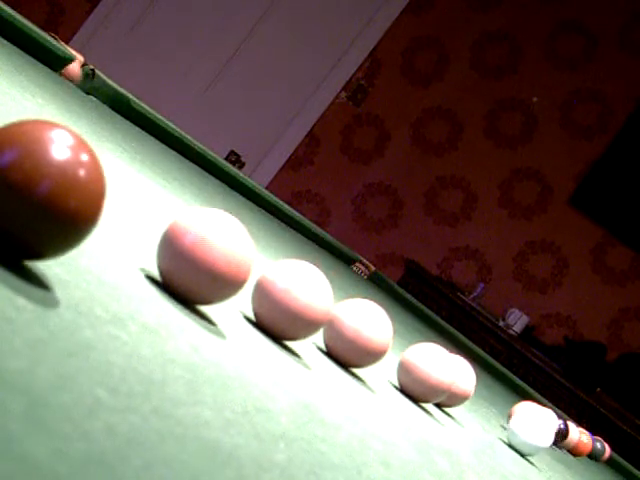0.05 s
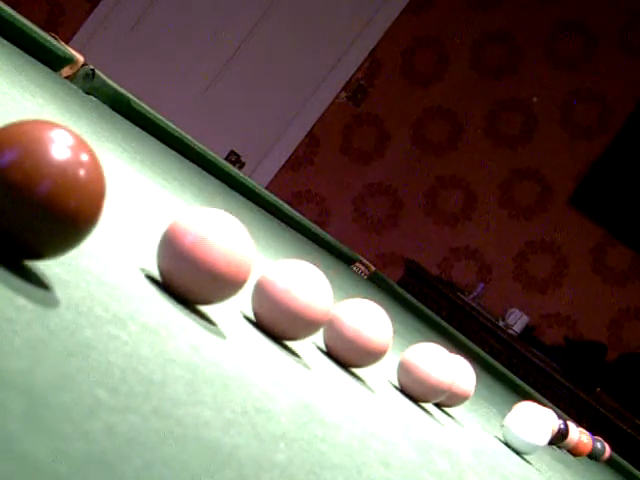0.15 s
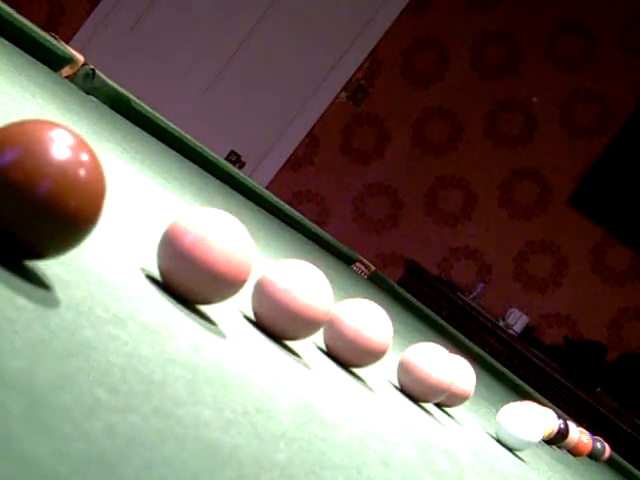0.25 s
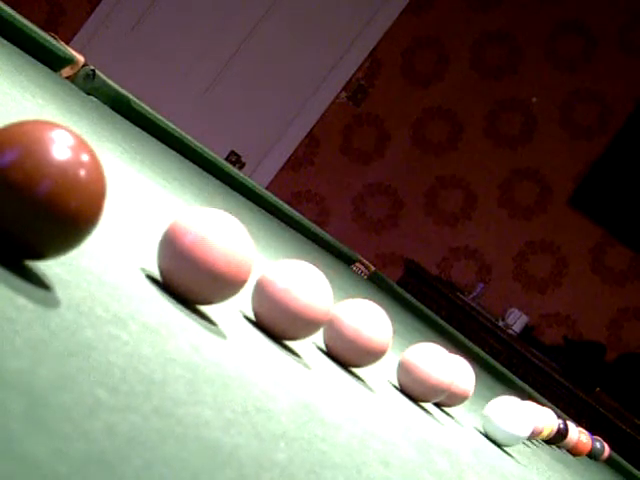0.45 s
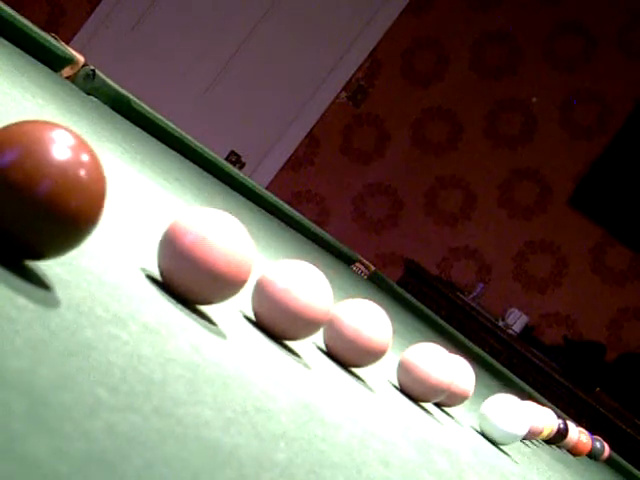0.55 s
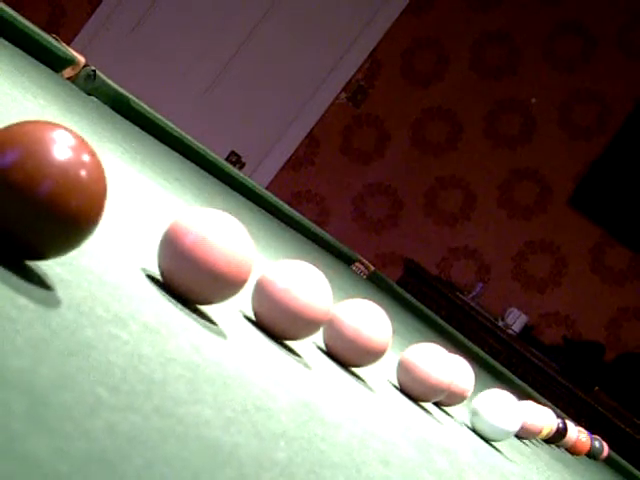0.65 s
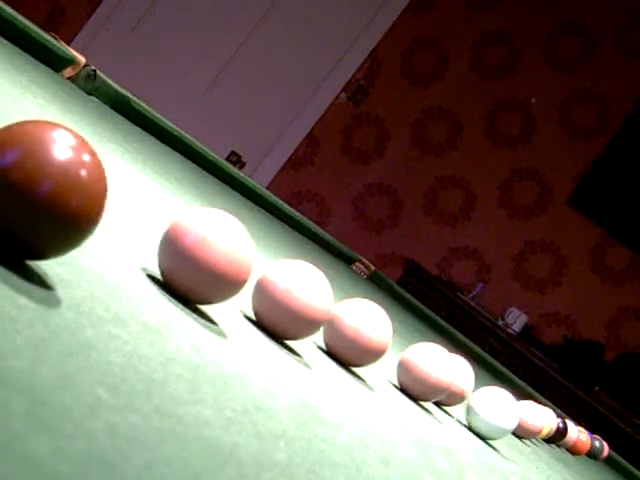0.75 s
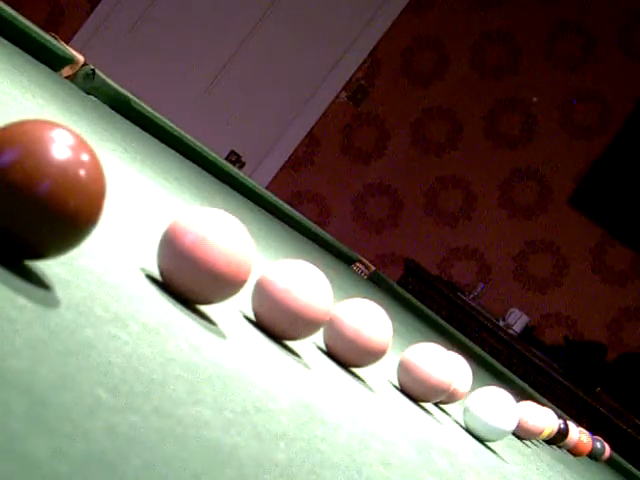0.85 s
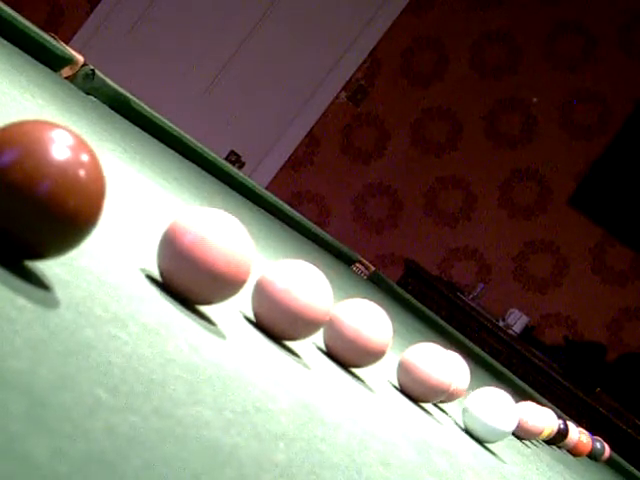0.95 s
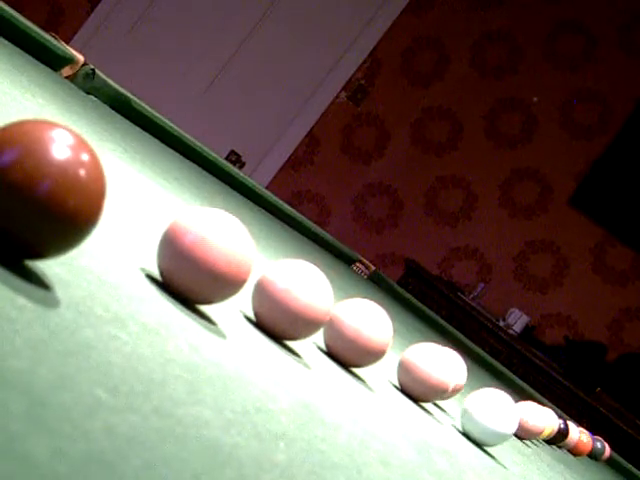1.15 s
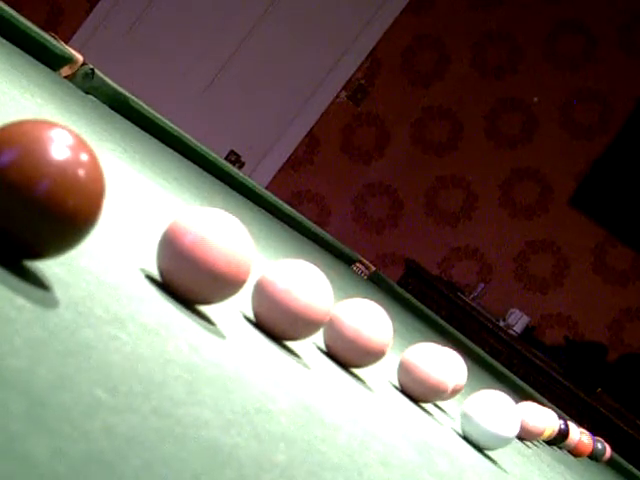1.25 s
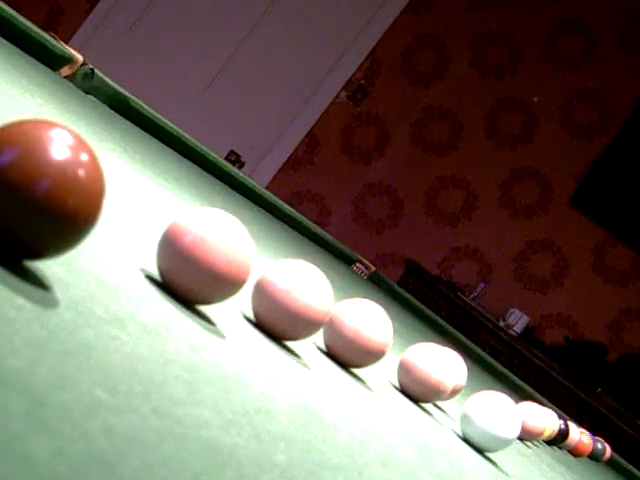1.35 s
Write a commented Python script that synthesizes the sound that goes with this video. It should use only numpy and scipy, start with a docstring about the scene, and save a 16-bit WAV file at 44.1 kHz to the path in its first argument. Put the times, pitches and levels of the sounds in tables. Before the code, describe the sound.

Heard from beside the table, a snooker ball knocks into a pocket just after a distant ball click fades. The thud echoes around a quiet hall, followed by a soft hiss and another faint, far click.

```python
"""A snooker ball thuds into a pocket close by, in a hard-walled hall that rings for about a second.
A quick run of contacts cracks and rings the pocket and rail, and the walls throw the thud back.
Balls click farther off, heard mostly as reverb; one click is already dying away at the start.
A soft hiss, a faint tap and a few low bumps pass over a quiet room tone."""
import sys
import numpy as np
from scipy import signal
from scipy.fft import rfft, irfft
from scipy.io import wavfile
from scipy.ndimage import uniform_filter1d

SR = 44100
rng = np.random.default_rng(int(sys.argv[2]) if len(sys.argv) > 2 else 0)


def inscribe(sig):
    """Save sig as 16-bit PCM at rate SR to the path in sys.argv[1].

    A 1-D sig is mono; a 2-D sig holds one channel per row.
    Samples are clipped to [-1, 1] before scaling.
    """
    pcm = np.round(np.clip(np.atleast_2d(sig).T, -1, 1) * 32767)
    wavfile.write(sys.argv[1], SR, pcm.astype(np.int16))


N = 61739
T = np.arange(N) / SR
FREQS = np.fft.rfftfreq(N, 1 / SR)


def amp(db):
    """Decibels to gain."""
    return 10 ** (np.asarray(db) / 20)


def by_hz(points, hz):
    """Read a curve of (f/Hz, value) points on a log-frequency axis."""
    curve = np.array(points, float)
    return np.interp(np.log(np.maximum(hz, 1)), np.log(curve[:, 0]), curve[:, 1])


def noise(colour):
    """Noise through an EQ curve, at rms 1."""
    x = irfft(rfft(rng.standard_normal(N)) * amp(by_hz(colour, FREQS)), N)
    return x / x.std()


def wavering_tone(hz, width_hz):
    """A narrow band of noise, at rms 1."""
    peak = 1 / (1 + ((FREQS - hz) / (width_hz / 2)) ** 2)
    x = irfft(rfft(rng.standard_normal(N)) * peak, N)
    return x / x.std()


def decay(start, t60):
    """Silence until start, then an exponential tail."""
    return (T >= start) * np.exp(-np.log(1000) * np.maximum(T - start, 0) / t60)


def attack(start, seconds):
    """A smooth rise from 0 to 1."""
    return 1 - np.exp(-np.maximum(T - start, 0) / seconds)


def ring(start, hz, t60):
    """One struck mode."""
    return decay(start, t60) * np.sin(2 * np.pi * hz * (T - start))


def delayed(x, seconds):
    """The same sound, shifted in time."""
    return np.interp(T - seconds, T, x, left=0)


def snap(start, colour, t60):
    """A noise transient, normalised to its peak."""
    burst = noise(colour) * decay(0, t60)
    return delayed(burst / np.abs(burst).max(), start)


def reflection_flicker(depth_db=1.27, grain_s=0.0024):
    """A grainy gain: single wall reflections arrive unevenly."""
    jitter = uniform_filter1d(rng.standard_normal(N), int(grain_s * SR))
    return amp(depth_db * jitter / jitter.std())


# cues for the distant clicks: t/s, direct level/dB, reverb level/dB, tilt/(dB per octave)
CLICK_CUES = [(-0.060, -29.5, -36.5, .6), (1.0794, -47, -50, -1.5)]
# EQ of a distant click: f/Hz, level/dB
CLICK_EQ = [(100, -26), (300, -15), (700, -11), (1150, -2), (1700, -2.5), (2500, 0.5), (3150, -1.5),
            (4400, -18), (7000, -26.5), (8500, -42.5)]
def distant_clicks(predelay_s=0.002):
    """Balls touch far away: a small tick, then a long wash from the walls."""
    out = 0
    for start, direct_db, wash_db, tilt_db in CLICK_CUES:
        colour = [(hz, db + tilt_db * np.log2(hz)) for hz, db in CLICK_EQ]
        wash_start = start + predelay_s
        wash = noise(colour) * decay(wash_start, t60=0.81) * attack(wash_start, 0.014)
        tick = snap(start, colour, t60=0.0061)
        out = out + amp(direct_db) * tick + amp(wash_db) * wash * reflection_flicker()
    return out


# EQ of the room's air: f/Hz, level/dB
AIR_EQ = [(25, 0), (60, -3.5), (100, -6), (160, -2), (220, -2.5), (300, 0), (500, -1), (1000, -5.5),
          (2000, -13), (4000, -12.5), (7600, -15), (8500, -24.5)]
def room_tone():
    """The bed: quiet air, a wavering hum and a thin high whine."""
    air = amp(-70.5) * noise(AIR_EQ)
    hum = amp(-74) * wavering_tone(hz=292.8, width_hz=24)
    whine = amp(-89.5) * wavering_tone(hz=7260, width_hz=110)
    return air + hum + whine


def lingering_tone():
    """A low tone, already ringing out at the start."""
    return amp(-61) * ring(0, hz=198, t60=1.5)


# cues for the low bumps: t/s, level/dB
BUMP_CUES = [(0.104, -64), (0.930, -62.5), (1.322, -60)]
def bumps():
    """Soft bumps: one low mode with a rounded attack."""
    return sum(amp(db) * ring(start, hz=155.4, t60=0.2) * attack(start, 0.0064)
               for start, db in BUMP_CUES)


# a quick run of contacts, then two light settling ticks: t/s, thud level/dB, crack level/dB
POCKET_HITS = [(0.2117, -24, -48.5), (0.2142, -15, -29), (0.2168, -15, -26), (0.2185, -15.5, -21.5),
               (0.2248, -25.5, -39.5), (0.2300, -36, -28.5), (0.355, -37, -35.5), (0.3663, -47, -36)]
# modes of the pocket and rail: f/Hz, level/dB, t60/s
POCKET_MODES = [(210, -18.5, 0.062), (354, -8, 0.066), (513, -5.5, .045), (900, -6.5, 0.016),
                (1159, -0.5, 0.015), (1254, -6, 0.025)]
# EQ of a contact's hard crack: f/Hz, level/dB
CRACK_EQ = [(100, -40), (1200, -10), (2000, -4), (3000, 4.5), (4200, -10.5), (5500, -14), (7000, -11.5),
            (8500, -32.5)]
def ball_in_pocket(low_cut_hz=190, high_cut_hz=1400):
    """Each contact rings the pocket and rail under a hard crack; returns both layers."""
    thud, crack = 0, 0
    for start, thud_db, crack_db in POCKET_HITS:
        body = sum(amp(db) * ring(start, hz, t60) for hz, db, t60 in POCKET_MODES)
        thud = thud + amp(thud_db) * body
        crack = crack + amp(crack_db) * snap(start, CRACK_EQ, t60=0.0073)
    # leather and cloth soften the thud; neither layer carries deep bass
    thud_band = signal.butter(3, [low_cut_hz, high_cut_hz], "bandpass", fs=SR, output="sos")
    low_cut = signal.butter(2, low_cut_hz, "highpass", fs=SR, output="sos")
    return signal.sosfilt(thud_band, thud), signal.sosfilt(low_cut, crack)


# decay time of the hall: f/Hz, t60/s
REVERB_TIMES = [(100, 1.5), (280, 0.96), (500, 0.94), (1000, 0.79), (2500, 0.9), (5000, .8), (8000, .75)]
def hall_reverb(start, colour, attack_s):
    """A diffuse tail: each half octave dies at its own rate."""
    spectrum = rfft(noise(colour))
    half_octaves = 2 * np.log2(np.clip(FREQS, 64, 8192))
    tail = 0
    for centre in range(12, 27):
        band = irfft(spectrum * np.maximum(1 - np.abs(half_octaves - centre), 0), N)
        tail = tail + band * decay(start, by_hz(REVERB_TIMES, 2 ** (centre / 2)))
    return tail * attack(start, attack_s)


# strong wall echoes, timed from the thud: t/s, level/dB
WALL_ECHOES = [(.031, -18.5), (.048, -16), (.063, -11.5), (.070, -15), (.106, -16), (.137, -19),
               (.176, -20), (.222, -23.5)]
# hall resonances left ringing: f/Hz, level/dB, t60/s
HALL_RESONANCES = [(197.4, -55.5, 1.3), (283.1, -40.5, 1.3), (296, -46, 1.5), (335, -42.5, 1.3),
                   (478, -42, 1.1), (815, -36.5, .8)]
# EQ of the thud's reverb: f/Hz, level/dB
THUD_REVERB_EQ = [(40, -40), (100, -38.5), (135, -17), (210, -10.5), (290, -1), (450, -3), (680, -1),
                  (830, 0), (1230, -3.5), (1450, -15), (2000, -22), (2850, -19.5), (4000, -32.5),
                  (6800, -33), (8500, -56.5)]
def hall_answer(thud, start=0.215):
    """The walls echo the thud, and the hall rings on in resonances and a diffuse tail."""
    echoes = sum(amp(db) * delayed(thud, lag) for lag, db in WALL_ECHOES)
    modes = sum(amp(db) * ring(start, hz, t60) for hz, db, t60 in HALL_RESONANCES)
    tail = amp(-23.5) * hall_reverb(start, THUD_REVERB_EQ, attack_s=0.007)
    return echoes + modes * attack(start, 0.03) + tail


# EQ of the hiss: f/Hz, level/dB
HISS_EQ = [(500, -19.5), (1500, -1.5), (3000, 0), (4500, -2.5), (6100, 2.5), (7400, -5), (8500, -24)]
def hiss(start=0.569, attack_s=0.017, hold_s=0.04, t60=0.63):
    """A soft hiss that opens quickly, holds and fades in the hall."""
    fade_in = np.interp(T, [start, start + attack_s], [0, 1])
    release = np.exp(-np.log(1000) * np.maximum(T - start - attack_s - hold_s, 0) / t60)
    return amp(-58) * noise(HISS_EQ) * fade_in * release


# EQ of the tap and its reverb: f/Hz, level/dB
TAP_EQ = [(100, -31), (600, -10), (1300, 0.5), (1800, -1), (2400, -3), (3000, -17), (8000, -36)]
def tap(start=0.9288):
    """A faint, dull tap and its wash from the walls."""
    direct = amp(-55) * snap(start, TAP_EQ, t60=0.017)
    return direct + amp(-69) * hall_reverb(start, TAP_EQ, attack_s=0.014)


def scene():
    """The mono mix, heard from beside the cloth."""
    thud, crack = ball_in_pocket()
    foreground = thud + crack + hall_answer(thud)
    background = distant_clicks() + tap() + hiss() + bumps() + lingering_tone() + room_tone()
    return (foreground + background)[None]


# master fader, held at its first level until the closing fade: t/s, level/dB
MASTER_FADER = [(1.28, -1.5), (1.325, -5), (1.40, -8.5)]
def record(dry, high_cut_hz=7750):
    """The level sinks at the very end, and a steep filter takes off the top."""
    times, levels_db = np.array(MASTER_FADER).T
    faded = dry * amp(np.interp(T, times, levels_db))
    return signal.sosfilt(signal.ellip(8, .2, 70, high_cut_hz, fs=SR, output="sos"), faded)


dry = scene()
out = record(dry)
inscribe(out)
```